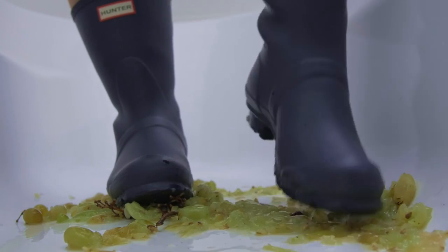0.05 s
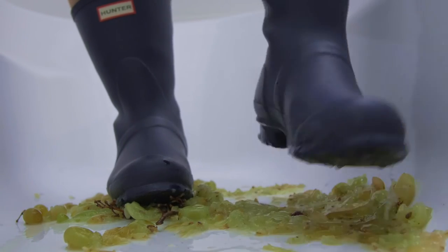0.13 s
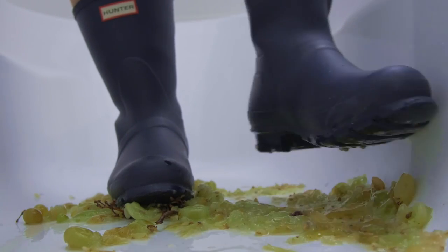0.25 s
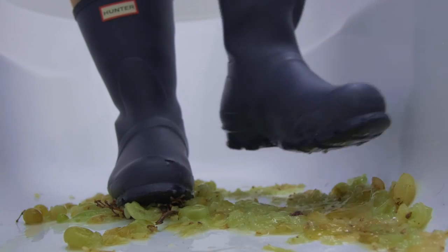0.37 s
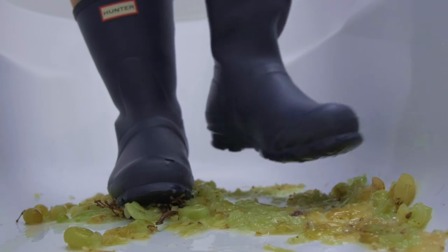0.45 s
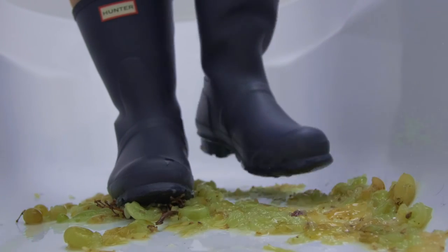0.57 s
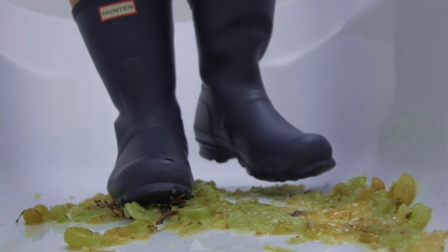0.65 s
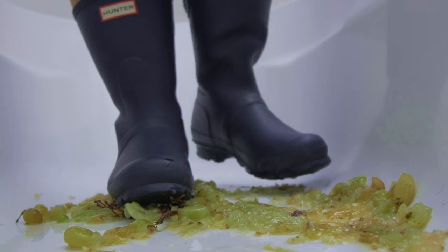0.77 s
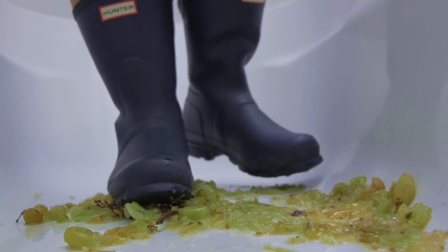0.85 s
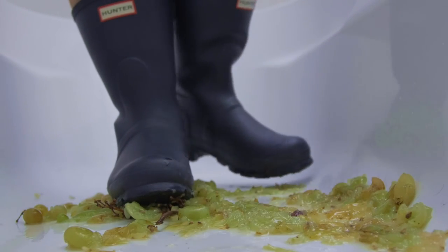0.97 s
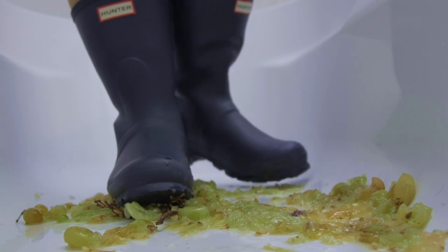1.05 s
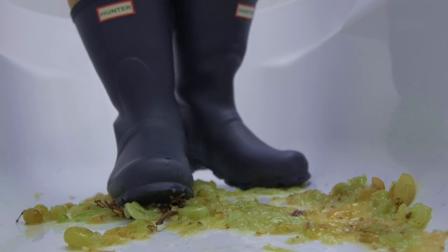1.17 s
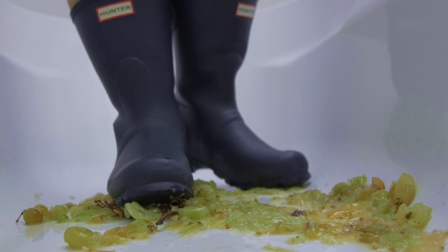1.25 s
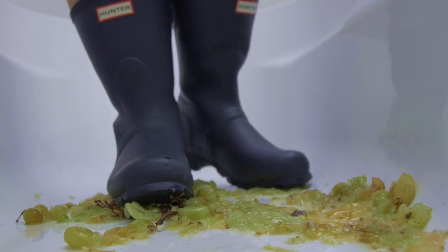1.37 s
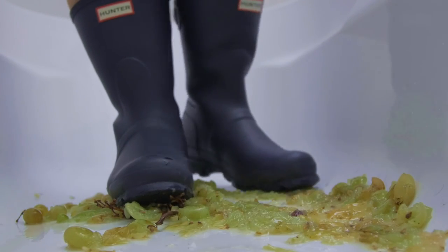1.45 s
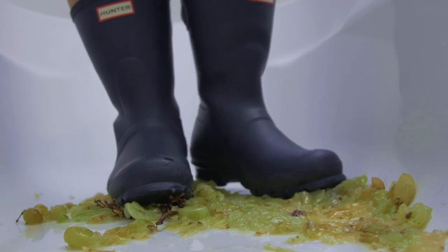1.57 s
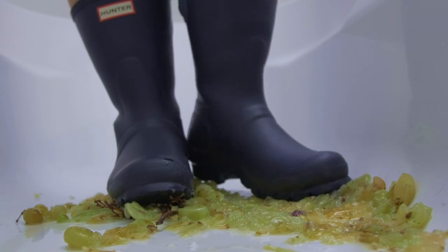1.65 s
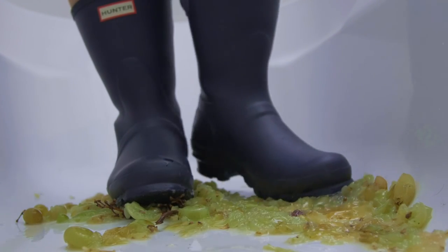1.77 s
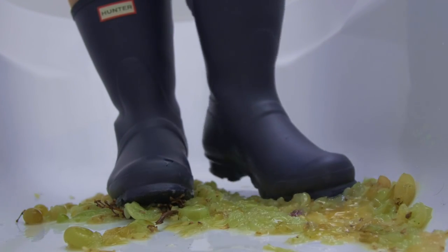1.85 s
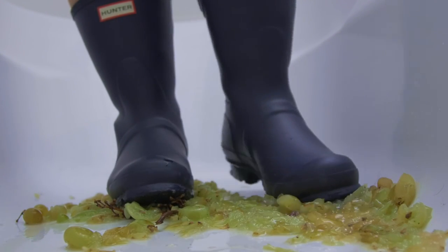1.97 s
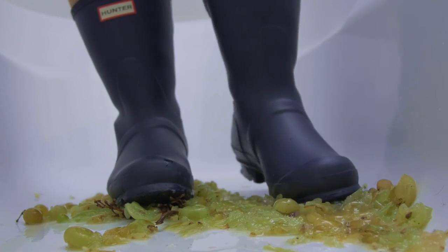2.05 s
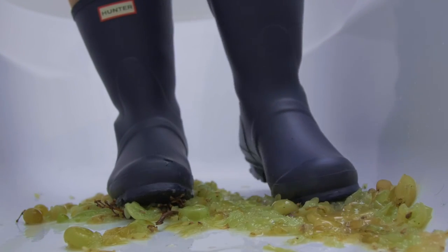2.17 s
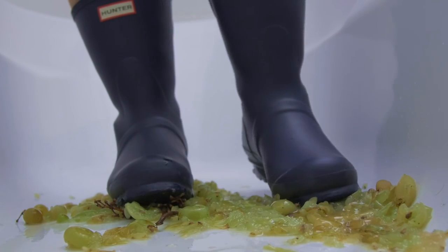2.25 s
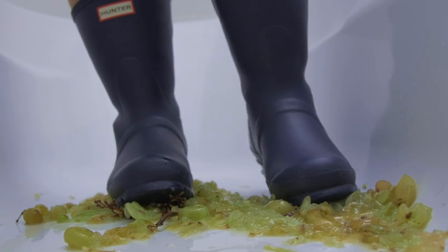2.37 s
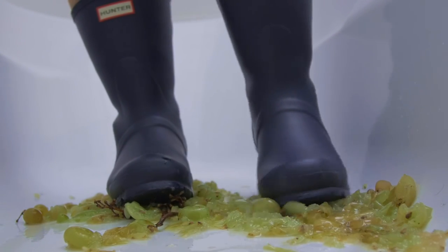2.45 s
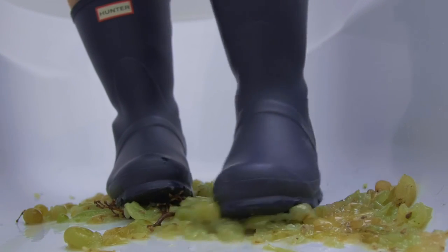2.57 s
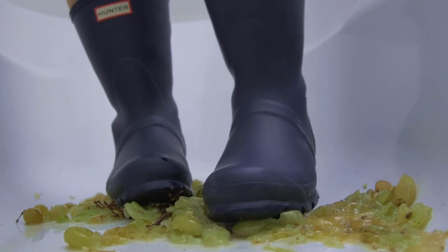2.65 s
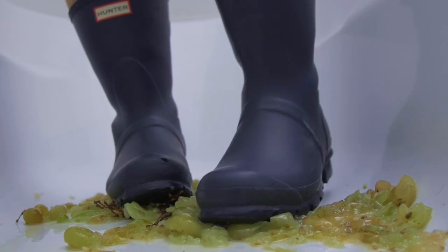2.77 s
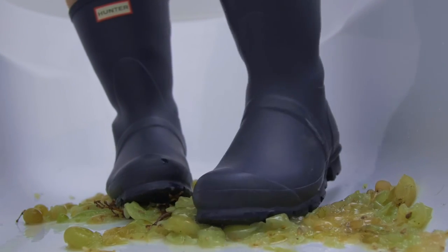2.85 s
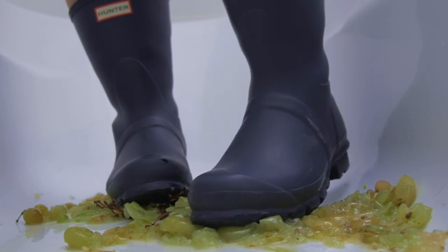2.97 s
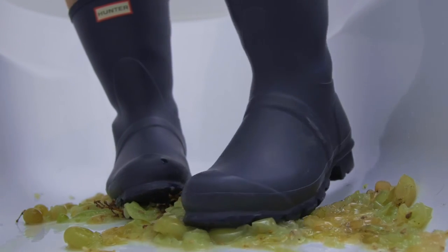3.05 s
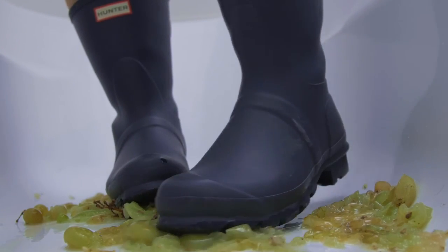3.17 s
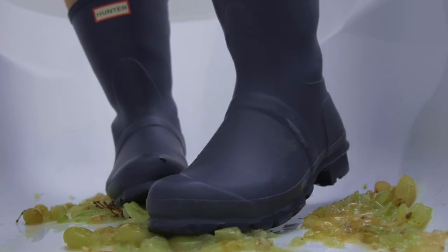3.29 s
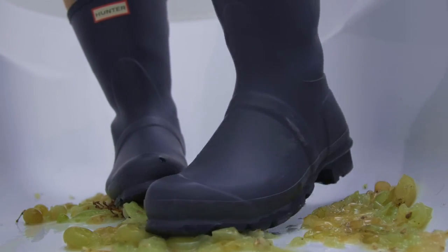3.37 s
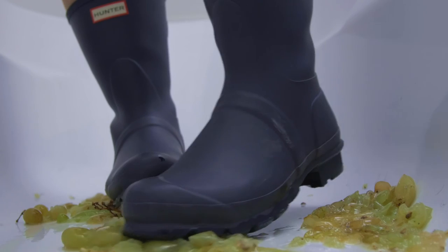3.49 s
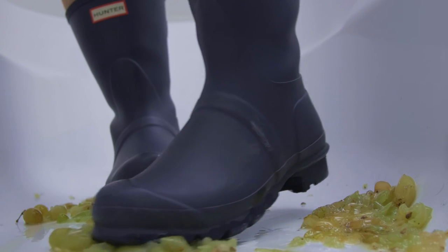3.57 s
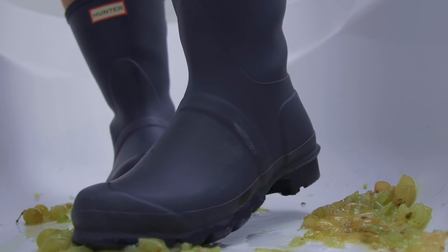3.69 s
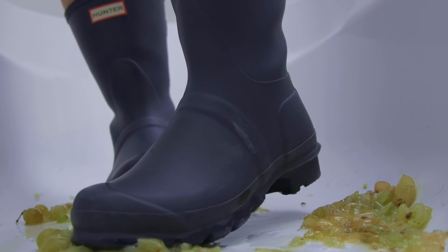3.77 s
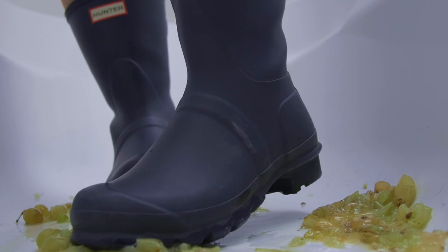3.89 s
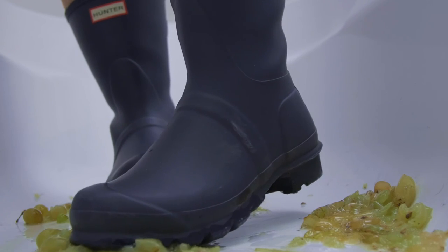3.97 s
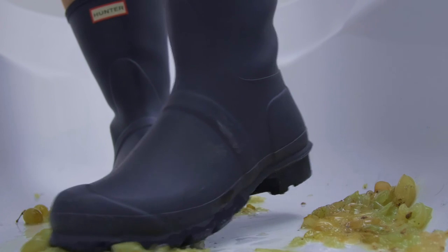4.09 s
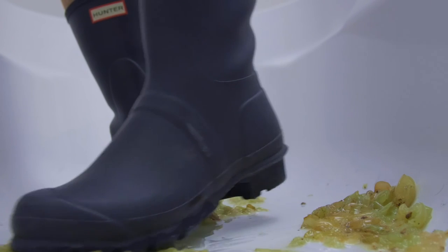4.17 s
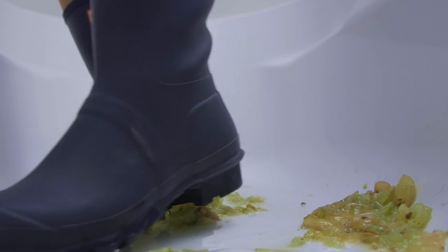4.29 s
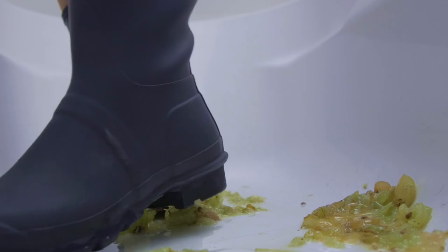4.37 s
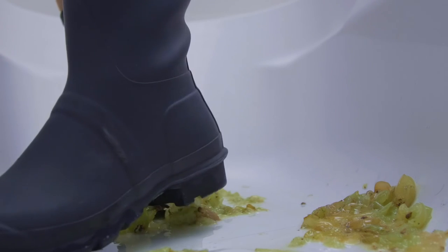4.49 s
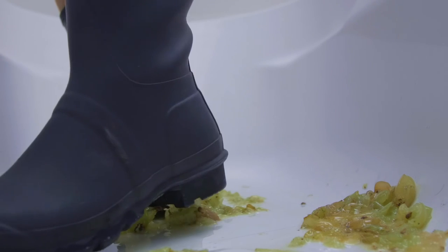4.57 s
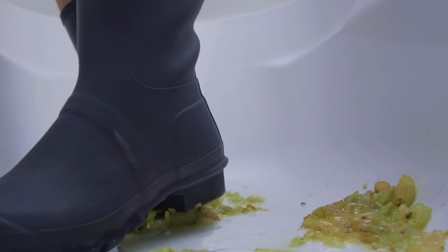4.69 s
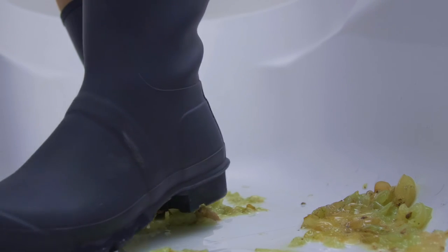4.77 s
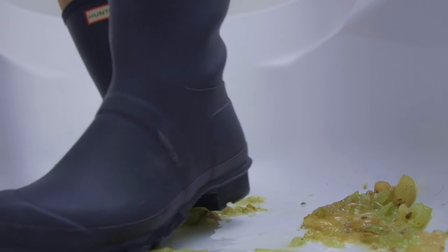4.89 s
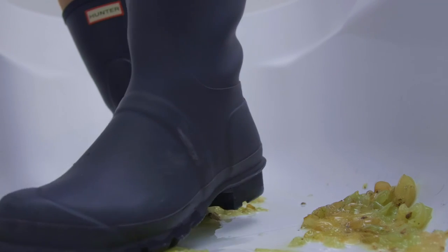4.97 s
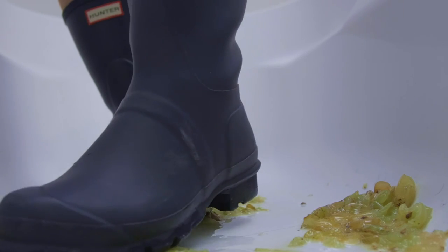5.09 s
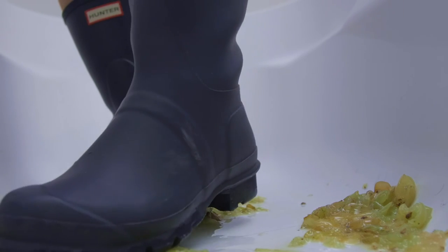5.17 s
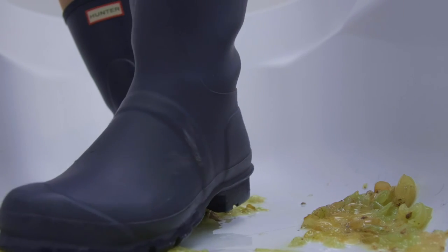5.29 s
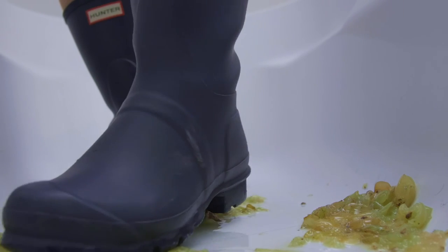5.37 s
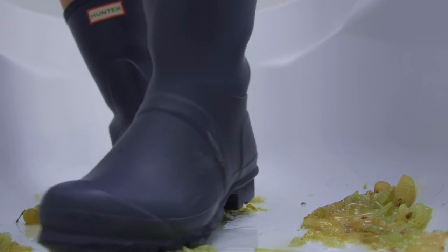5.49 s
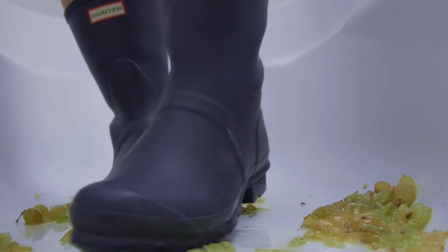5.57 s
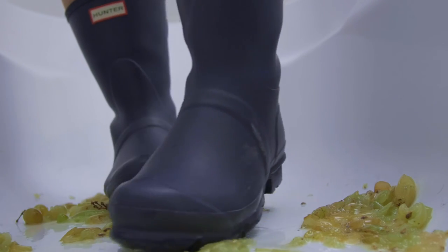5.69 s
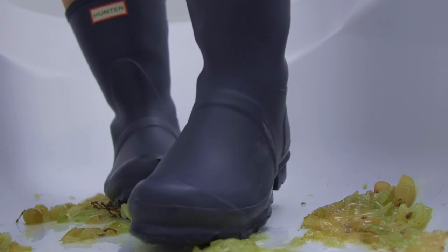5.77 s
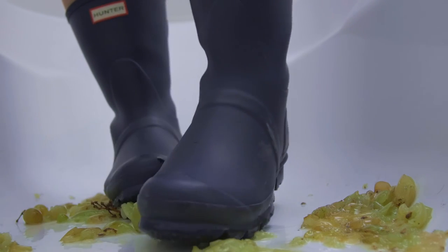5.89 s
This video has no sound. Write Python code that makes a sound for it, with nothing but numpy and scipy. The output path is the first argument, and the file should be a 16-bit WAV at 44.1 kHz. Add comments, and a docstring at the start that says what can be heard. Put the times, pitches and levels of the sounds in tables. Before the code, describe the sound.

A close microphone hears rubber boots on crushed grapes inside a hard tub, with a short, lively echo. A quiet low hum beats slowly throughout, with a faint far engine drone, rumble and room tone. From 0 to 0.25 s the sole peels away in small wet snaps and scuffs; at 0.27 s it bumps the tub with a dull, low thud. Only faint brushing follows until 1.15 s. Brief scrapes and chirps come at 1.2, 1.4 and 1.6 s, then a wavering squeak from 1.7 to 2.05 s. At 2.35-2.7 s a squeal sweeps upward, snaps and drops. Longer squeaky drags rise and fall at 3.0-3.3, 3.45-3.7 and 4.05-4.45 s, the last with four soft knocks from 4.18 to 4.36 s. More rubbery, gritty strokes come at 4.7-5.05 and 5.4-5.7 s, with sharp wet clicks near 5.5 s, then a thin descending squeak fades out.

```python
"""Throughout, a machine hums with a slow beat, a far engine drones, and rumble and room tone lie below.
First a rubber boot peels off grape pulp with wet snaps and scuffs, and bumps the wall of a hard tub.
Then it drags to and fro: the sole sticks and slips, so stacked sines squeak at a pitch that follows the
sliding speed, wrapped in scraping made of random grains and tiny chirps. Late in the dragging it knocks
four times more, as short blows into ringing tub modes. A small echoing room answers the boot."""
import sys
import numpy as np
from scipy import signal
from scipy.fft import rfft, irfft, next_fast_len
from scipy.io import wavfile

SR = 44100
rng = np.random.default_rng(int(sys.argv[2]) if len(sys.argv) > 2 else 0)


def unload_audio(sound):
    """Save the sound as a 16-bit wav file, at the path given as the first command line argument."""
    columns = np.transpose(np.atleast_2d(sound))
    # keep every value between -1 and 1, then stretch to whole-number steps
    steps = np.round(np.clip(columns, -1, 1) * 32767)
    wavfile.write(sys.argv[1], SR, steps.astype(np.int16))


def gain_from_decibels(decibels):
    """Convert decibel values to linear amplitude factors."""
    exponent = np.asarray(decibels, float) / 20
    return 10 ** exponent


N = 261954   # length [samples]

# Levels in the tables are those of each layer ahead of the mix.
# two close machine tones that beat: (frequency [Hz], phase [turns])
HUM_TONES = [(99.0, 0.0), (100.285, 0.02)]
# level of each machine tone: (level [dB])
HUM_LEVELS = [-48.5, -55.5]
# far engine, wandering in pitch: (time [s], frequency [Hz], level [dB])
ENGINE_DRONE = [(0, 59.7, -54), (1.0, 50.54, -62), (1.5, 51.73, -50), (1.9, 58.16, -50.5), (2.2, 63.1, -53),
                (2.8, 65.4, -56), (3.0, 60.4, -62), (3.2, 66.7, -51), (3.6, 62.5, -59), (4.3, 65.9, -71),
                (4.5, 66.7, -54), (5.0, 64.4, -60), (5.3, 63.2, -77.5), (5.94, 64, -57)]
# colour of the room tone: (frequency [Hz], density [dB per Hz])
ROOM_TONE = [(82, -44), (140, 1), (316, -8), (377, -9), (561, -13.5), (670, -19.5), (903, -17.5),
             (1100, -17.5), (1570, -22), (1700, -28), (1880, -24.5), (3480, -23), (5480, -33),
             (7680, -37.5), (16000, -37.5)]
# colour of the faint steady hiss, opposite in the two channels: (frequency [Hz], density [dB per Hz])
SIDE_HISS = [(60, -21), (300, -11.5), (2000, -16), (15000, -22), (17000, -38)]
# decay of the room: (frequency [Hz], time to fall 60 dB [s])
ROOM_DECAY = [(200, 0.44), (1000, 0.36), (3500, 0.36), (8000, 0.33), (15000, 0.23)]
# resonances of the air in the tub: (frequency [Hz], width [Hz], level [dB])
TUB_AIR = [(421, 30, 2.5), (1013, 24, -3.5), (1340, 52, -9.5), (2230, 73, -44), (2660, 120, -12.5),
           (3005, 19, -27), (3720, 430, -1.5), (4270, 23, -35), (3940, 34, -20.5), (5200, 71, -67.5)]
# modes of the tub wall: (frequency [Hz], level [dB], time to fall 60 dB [s])
TUB_WALL = [(69.8, -14, 0.51), (93.5, -9, 0.49), (128, 0, 0.43), (182, 13, 0.11), (267, 4, 0.17),
            (430, -7.5, 0.25)]
# the boot knocks the tub: (time [s], blow strength [dB])
KNOCKS = [(0.271, -15.5), (4.18, -38.5), (4.231, -33.5), (4.294, -30.5), (4.359, -32)]
# wet snaps and catches of the tread: (time [s], peak [dB], ring [Hz], rise to the peak [cycles])
WET_SNAPS = [(0.025, -40, 360, 1.5), (0.043, -49, 446, 2.4), (0.074, -28.5, 2830, 1.2),
             (0.132, -42.5, 1600, 2), (0.179, -31.5, 4100, 3.2), (0.198, -46, 718, 3.7),
             (1.14, -44, 4070, 2.6), (1.371, -42, 3870, 3.5), (1.601, -32, 2620, 5.7),
             (2.27, -52, 429.5, 3), (2.595, -4, 1946, 2.6), (4.372, -10, 2744, 9.3),
             (5.489, -15, 3930, 2.7), (5.555, -10.5, 2920, 6.3), (5.568, -7, 3540, 2),
             (5.582, -3, 4200, 1.2)]
# light brushes without a squeak:
# (time [s], length [s], level [dB], dull part [dB against level], bright part [dB against level])
BRUSHES = [(0.0, 0.085, -36.5, -8, -13), (0.075, 0.087, -42.5, -10, -5.5), (0.169, 0.042, -37.5, 0.5, -5),
           (0.403, 0.08, -53, -14, -19), (0.542, 0.235, -53, -22, -4.5), (0.836, 0.45, -67, -8, 11.5),
           (1.138, 0.017, -34, -15, -11), (2.744, 0.11, -32, -6, -15)]
# colour of the rubbing bodies: (frequency [Hz], density [dB per Hz])
RUB_COLOUR = [(120, -44.5), (200, -6.5), (278, -13), (590, -6.5), (683, -4.5), (1320, -5.5), (1710, -7),
              (1980, -4), (2420, 0), (3620, -1.5), (6880, -13), (13800, -25), (16000, -35)]
# the sole slides, one table a stroke:
# (time [s], slip rate [Hz], squeak [dB], overtones [dB against squeak], scrape [dB])
STROKES = [
    [(1.16, 8400, -71, 0, -46), (1.172, 5600, -37.5, -9, -31.5), (1.192, 2100, -35, 0, -15),
     (1.205, 954, -37, 2.5, -9.5), (1.217, 490, -30.5, -4, -18), (1.235, 300, -61, -4, -57)],
    [(1.371, 600, -63, -8, -33.5), (1.387, 1050, -36.5, -21, -28.5), (1.397, 1863, -52.5, 8, -21.5),
     (1.43, 3730, -47, 3, -30), (1.46, 4000, -63, 4, -30)],
    [(1.6, 2200, -75, -5, -31), (1.612, 2140, -49, 2, -22), (1.623, 2002, -17.5, -5, -18),
     (1.645, 1500, -21, 3.5, -33), (1.66, 1073, -28.5, -10, -18), (1.688, 370, -38.5, -12, -16.5),
     (1.7, 300, -76, -3, -58)],
    [(1.72, 600, -73, 2, -23), (1.744, 950, -46, -4, -21), (1.754, 1250, -37, -12, -21.5),
     (1.764, 1727, -31, 0.5, -15), (1.792, 2230, -29.5, -3.5, -35), (1.835, 2000, -28, 0.5, -18),
     (1.865, 2000, -35.5, 0.5, -33), (1.9, 2600, -27.5, -5, -28), (1.93, 2633, -24.5, -4.5, -26.5),
     (1.96, 2500, -27.5, -3.5, -20.5), (1.982, 1940, -28, 6.5, -13), (2.016, 1255, -26.5, -5, -21),
     (2.03, 876, -33, 1, -30), (2.048, 403, -36, -11, -35), (2.06, 300, -55, -14, -40)],
    [(2.352, 650, -54, -12, -42), (2.374, 790, -51, -4, -45), (2.384, 800, -49, 3.5, -42)],
    [(2.385, 374, -38, 13.5, -20.5), (2.4, 500, -31.5, -4, -17), (2.42, 650, -30.5, -0.5, -20),
     (2.45, 1278, -24, -6, -20), (2.46, 2150, -47, 5, -6), (2.474, 2790, -21.5, -30, -26.5),
     (2.5, 3700, -27.5, -10.5, -18.5), (2.536, 5130, -26.5, -8.5, -40.5), (2.548, 5300, -36, -3, -34),
     (2.57, 5160, -70, 0, -31)],
    [(2.594, 1870, -37, -16, -13.5), (2.614, 1920, -42, -23, -8.5), (2.64, 1950, -31, 11, -10),
     (2.652, 1196, -16.5, -5, -11.5), (2.665, 317, -34.5, -15, -13), (2.68, 300, -83, 0, -18.5)],
    [(2.987, 354, -29, -15, -17), (3.003, 450, -35.5, 3.5, -52), (3.03, 545, -32, -2, -18.5),
     (3.064, 755, -22.5, -9.5, -25), (3.092, 1114, -27.5, -10, -12), (3.115, 1252, -26, 1, -21.5),
     (3.136, 1556, -18, -33, -3), (3.146, 1296, -40, 2, -14), (3.19, 1320, -44, -5, -21),
     (3.196, 1707, -29.5, -3, -14.5), (3.229, 1431, -19, -6, -24), (3.244, 1240, -23, -5.5, -41.5),
     (3.26, 861, -24.5, -7, -44), (3.275, 479, -27, -11, -10), (3.285, 400, -43, -12, -39)],
    [(3.44, 641, -34, -0.5, -15), (3.462, 1246, -24.5, -1.5, -17.5), (3.477, 1550, -11, -8.5, -36),
     (3.481, 1390, -30, -4, -13), (3.494, 1413, -35.5, 10, -18.5), (3.513, 1550, -36, 11, -11.5),
     (3.519, 4530, -44, -16, -24), (3.535, 4780, -31.5, -23, -37.5), (3.565, 5190, -31, -14, -37),
     (3.587, 4900, -29, -16, -29), (3.621, 3990, -33, -18, -25), (3.656, 3440, -42, -9, -11.5),
     (3.662, 1388, -23, -5, -20.5), (3.68, 1180, -29.5, -1.5, -15.5), (3.696, 787, -26.5, -3.5, -22.5),
     (3.708, 430, -30.5, -6, -28), (3.72, 300, -42, -5, -60)],
    [(4.053, 506, -25.5, -34, -28), (4.068, 600, -29.5, -10, -23.5), (4.095, 1248, -24, -5, -26.5),
     (4.11, 1486, -27.5, -6, -12), (4.136, 2056, -59.5, 27.5, -33), (4.16, 2080, -49.5, 31, -26),
     (4.166, 5450, -36, -9, -16), (4.19, 5270, -34, -14, -29), (4.205, 5500, -36, -7, -33),
     (4.218, 5850, -40, -5, -42), (4.235, 7800, -39, -15, -33), (4.246, 7000, -46, -13, -31),
     (4.252, 6250, -39, -3, -33), (4.296, 6200, -56, -20, -38)],
    [(4.298, 2830, -44, -10, -20), (4.306, 2900, -27, -17, -17.5), (4.318, 3100, -68, -12, -24.5),
     (4.339, 3459, -25, -34, -23.5), (4.366, 3350, -31.5, -20, -16.5), (4.374, 3100, -46, -21, -10),
     (4.393, 1550, -22.5, 4.5, -23.5), (4.406, 974, -32.5, 6, -20.5), (4.43, 279, -35.5, -9, -27.5),
     (4.44, 250, -31, -14, -51)],
    [(4.68, 468, -48, -4, -51), (4.707, 730, -33, -4, -21), (4.713, 276, -29, -4, -18),
     (4.735, 285.4, -24, -10, -25.5), (4.752, 287.2, -25.5, -5, -18), (4.765, 364.6, -26, -6, -14),
     (4.79, 639, -39, 12, -15.5), (4.824, 850, -32.5, 0, -9.5), (4.83, 1750, -20, 0.5, -12),
     (4.878, 1800, -37, 2, -15.5), (4.884, 1550, -23.5, 10.5, -18), (4.895, 1707, -35, 5.5, -22),
     (4.908, 1900, -23, -9, -22), (4.925, 1996, -36.5, 16, -26), (4.94, 1860, -45, 20, -15),
     (4.96, 1922, -42, 16, -20.5), (4.975, 1680, -45.5, 25.5, -21), (4.987, 1598, -28.5, 1, -31.5),
     (5.01, 900, -25.5, -8.5, -19), (5.04, 370, -24, -3.5, -36), (5.06, 220, -30.5, -41, -55)],
    [(5.386, 199, -35.5, -4, -12.5), (5.407, 281, -27.5, -0.5, -22.5), (5.44, 705, -22.5, -4, -11),
     (5.458, 860, -30.5, 1.5, -12), (5.472, 1250, -28, 3, -21), (5.486, 1817, -26.5, 2, -16),
     (5.5, 2150, -45, 19, -16), (5.511, 2223, -16, -23, -36.5), (5.528, 2180, -30, 0, -12),
     (5.545, 2513, -28, -6, -39), (5.563, 2870, -16, -12, -41), (5.569, 2150, -43, 4, -41),
     (5.6, 2220, -52, 15, -41), (5.63, 2134, -40, 13.5, -18.5), (5.655, 2224, -50.5, 17, -26),
     (5.685, 2130, -58, 20, -35)],
    [(5.69, 7400, -43, -16, -43), (5.71, 7600, -43, -13, -35), (5.752, 7600, -44, -18, -50),
     (5.782, 6500, -36.5, -14, -36), (5.816, 3964, -39, -9, -43.5), (5.852, 2940, -44, -8, -35.5),
     (5.882, 2350, -42, -24, -35.5), (5.887, 1700, -35, -20, -41), (5.905, 1500, -53, -18, -59),
     (5.94, 1250, -77, 0, -72)],
]
# treble fizz, one table a stroke, ahead of a common lift: (time [s], level [dB])
STROKE_FIZZ = [
    [(1.16, -60), (1.164, -51), (1.174, -42), (1.2, -35), (1.235, -46)],
    [(1.371, -53), (1.385, -40), (1.423, -41.5), (1.46, -44)],
    [(1.6, -47), (1.61, -30.5), (1.642, -36.5), (1.7, -64)],
    [(1.72, -52), (1.778, -37.5), (1.866, -37), (1.902, -35.5), (2.012, -35.5), (2.06, -53.5)],
    [(2.352, -64), (2.354, -61), (2.38, -48), (2.384, -51)],
    [(2.385, -49), (2.395, -37.5), (2.523, -32), (2.551, -35), (2.559, -42.5), (2.57, -43)],
    [(2.594, -35), (2.636, -33), (2.68, -48)],
    [(2.987, -55), (3.003, -48.5), (3.125, -40), (3.239, -33.5), (3.265, -44.5), (3.285, -54)],
    [(3.44, -43), (3.568, -44), (3.574, -46), (3.624, -45), (3.634, -32.5), (3.694, -36.5), (3.72, -54)],
    [(4.053, -54.5), (4.067, -41.5), (4.155, -36), (4.167, -51.5), (4.261, -34), (4.287, -41.5),
     (4.296, -41)],
    [(4.298, -39), (4.31, -45.5), (4.322, -37), (4.372, -41), (4.44, -54)],
    [(4.68, -66), (4.708, -48.5), (4.836, -35.5), (4.954, -31), (5.022, -44), (5.06, -61)],
    [(5.386, -55), (5.4, -49), (5.596, -28), (5.602, -26), (5.618, -35), (5.685, -32.5)],
    [(5.69, -37), (5.812, -50.5), (5.828, -39.5), (5.94, -70)],
]
# extra dull scrape, one value a stroke: (level [dB])
STROKE_DULLNESS = [-3, 8.5, 5, -1, 6, -2.1, 0.1, -0.2, 4, 10.7, 6, 1.5, 1.5, -4]
# single tread blocks whistle:
# (time [s], length [s], start pitch [Hz], end pitch [Hz], start level [dB])
BLOCK_WHISTLES = [(1.19, 0.065, 928, 977, -32.5), (1.405, 0.016, 5060, 8500, -46.5),
                  (1.586, .016, 7000, 5600, -44), (1.602, 0.026, 7200, 6900, -28),
                  (1.936, .04, 4000, 2480, -25.5), (1.96, 0.035, 3500, 3810, -36),
                  (2.442, 0.017, 2263, 2860, -15), (2.603, .05, 2970, 2860, -25.5),
                  (3.55, 0.129, 1620, 1520, -44.5), (3.653, 0.05, 4500, 1976, -45),
                  (4.243, 0.045, 8050, 9800, -44), (4.303, .027, 7150, 6020, -34),
                  (4.348, 0.03, 2033, 2370, -21), (4.39, .025, 3330, 2800, -45),
                  (4.878, 0.029, 1830, 2026, -21.5), (4.894, 0.024, 5610, 6250, -22),
                  (4.966, .06, 2740, 2986, -26.5), (5.484, 0.071, 4100, 3660, -28.5),
                  (5.54, 0.038, 3600, 3930, -28), (5.584, 0.039, 5050, 4450, -24),
                  (5.632, 0.058, 5260, 5060, -36), (5.676, 0.054, 5120, 6670, -34.5)]
# tread blocks slipping together: (rate offset [share], level [dB])
TREAD_BLOCKS = [(0, 0.5), (-.06, -8.5)]


def rms_one(x):
    """Scales a signal to an rms of 1."""
    return x / np.sqrt(np.mean(x ** 2) + 1e-20)


def at_hz(points, hz):
    """Reads a table at any frequency, straight on a log frequency axis."""
    table = np.array(points)
    return np.interp(np.log(hz), np.log(table[:, 0]), table[:, 1])


def span(rows):
    """Gives the sample indices that a table covers, and its columns at those samples."""
    times, *columns = np.transpose(rows)
    at = np.arange(int(times[0] * SR), min(int(times[-1] * SR), N))
    return at, [np.interp(at / SR, times, column) for column in columns]


def drift(rate_hz):
    """Slow chance: noise twice through a one-pole low-pass, rms 1."""
    r = np.exp(-2 * np.pi * rate_hz / SR)
    noise = rng.standard_normal(N + SR)
    settled = signal.lfilter([1], [1, -2 * r, r * r], noise)[SR:]
    return rms_one(settled)


def shaped(x, points):
    """Weights the spectrum of x by a dB curve, rms 1."""
    size = next_fast_len(len(x))
    hz = np.maximum(np.arange(size // 2 + 1) * SR / size, 1)
    return rms_one(irfft(rfft(x, size) * gain_from_decibels(at_hz(points, hz)), size)[:len(x)])


def filtered(x, order, hz, kind):
    """Butterworth filter of the given kind."""
    return signal.sosfilt(signal.butter(order, hz, kind, fs=SR, output="sos"), x)


def edges(size, rise_s, fall_s):
    """Straight ramps for the quick start and soft end of a contact."""
    t = np.arange(size) / SR
    return np.minimum(1, np.minimum(t / rise_s, t[::-1] / fall_s))


def machine_hum():
    """Two steady sines a little over 1 Hz apart, so their sum swells and sinks."""
    t = np.arange(N) / SR
    out = np.zeros(N)
    for (hz, turns), db in zip(HUM_TONES, HUM_LEVELS):
        out += gain_from_decibels(db) * np.sqrt(2) * np.sin(2 * np.pi * (hz * t + turns))
    return out


def engine_drone():
    """One low sine whose pitch and level wander."""
    out = np.zeros(N)
    at, (hz, db) = span(ENGINE_DRONE)
    out[at] = gain_from_decibels(db) * np.sqrt(2) * np.sin(2 * np.pi * np.cumsum(hz) / SR)
    return out


def rumble():
    """Low band of noise that swells at random."""
    low = rms_one(filtered(rng.standard_normal(N), 2, [45, 80], "band"))
    return gain_from_decibels(-61 - 0.5 * drift(2.8)) * low


def room_tone():
    """Broad coloured noise whose level drifts by about 1 dB."""
    return gain_from_decibels(-52.5 + 1.0 * drift(2.3)) * shaped(rng.standard_normal(N), ROOM_TONE)


def background():
    """Sum of the hum, the drone, the rumble and the room tone."""
    return machine_hum() + engine_drone() + rumble() + room_tone()


def ring(blow, hz, t60):
    """A two-pole resonator rings like one mode of a struck body."""
    r, w = gain_from_decibels(-60 / (t60 * SR)), 2 * np.pi * hz / SR
    return signal.lfilter([0, np.sin(w)], [1, -2 * r * np.cos(w), r * r], blow)


def knocks(soft_hz, body_db):
    """Each knock is a soft, low-passed blow into the low modes of the tub."""
    blow = np.zeros(N)
    for s, db in KNOCKS:
        blow[round(s * SR)] = -gain_from_decibels(db + body_db)
    blow = filtered(blow + 1e-18, 2, soft_hz, "low")   # the offset only spares the filters tiny numbers
    return sum(gain_from_decibels(db) * ring(blow, hz, t60) for hz, db, t60 in TUB_WALL)


def snaps():
    """Each snap is a sine at its own pitch that swells and dies within a few cycles."""
    out, t = np.zeros(N), np.arange(SR // 20) / SR
    for s, db, hz, cycles in WET_SNAPS:
        at = round(s * SR)
        age = t * hz / cycles   # 1 at the peak
        swell = (age * np.exp(1 - age)) ** 2
        out[at:at + len(t)] += gain_from_decibels(db) * swell * np.sin(2 * np.pi * hz * t)
    return out


def contacts():
    """Yields sample indices, scrape level and its dull and bright shares for every contact of the sole."""
    for rows, fizz, duller_db in zip(STROKES, STROKE_FIZZ, STROKE_DULLNESS):
        at, (hz, *_, db) = span(rows)
        # slow sliding is duller, up to a ceiling
        dull_db = np.minimum(-9.5 - 9.5 * np.log2(hz / 1000), -7) + duller_db
        fizz_db = np.interp(at / SR, *np.transpose(fizz)) + 9.5
        yield at, (db, dull_db, fizz_db - db)
    for s, length, db, dull_db, bright_db in BRUSHES:
        # a brush weakens by 4 dB along its length
        yield span([(s, db, dull_db, bright_db), (s + length, db - 4, dull_db, bright_db)])


def chirps(count, longest_s, sweep):
    """Single skins and tread edges let go in brief gliding whistles, scattered in time and pitch."""
    out = np.zeros(N + SR)
    for when, pitch, length, glide, size in rng.random((count, 5)):
        t = np.arange(int(SR * longest_s * (0.35 + 0.55 * length))) / SR
        hz = 2000 * 6.5 ** pitch * np.exp(sweep * (2 * glide - 1) * t / longest_s)
        at = int(when * N)
        level = gain_from_decibels(at_hz(RUB_COLOUR, hz[0]) + 4.8 * size) * np.sqrt(hz[0])
        whistle = np.sin(2 * np.pi * np.cumsum(np.minimum(hz, 16000)) / SR)
        out[at:at + len(t)] += level * np.hanning(len(t)) * whistle
    return rms_one(out[:N])


def scrape(grit_db, grains_per_s, patchy_db):
    """Dense random grains of skins and seeds under the sole, in dull, middle and bright parts."""
    sizes = gain_from_decibels(grit_db * np.minimum(rng.exponential(1, N), 4)) * rng.standard_normal(N)
    grains = sizes * (rng.random(N) < grains_per_s / SR)
    grit = shaped(grains, RUB_COLOUR) + gain_from_decibels(-6.0) * chirps(count=1500, longest_s=0.04, sweep=0.35)
    parts = (filtered(grit, 3, 1300, "low"),
             filtered(grit, 3, [1300, 6500], "band"),
             filtered(grit, 3, 6500, "high"))
    # each part grows patchy by itself
    dull, middle, bright = [rms_one(part) * gain_from_decibels(patchy_db * drift(53.0)) for part in parts]
    out = np.zeros(N)
    for at, (db, dull_db, bright_db) in contacts():
        mix = middle[at] + gain_from_decibels(dull_db) * dull[at] + gain_from_decibels(bright_db) * bright[at]
        out[at] += edges(len(at), 0.00033, 0.0023) * gain_from_decibels(db) * mix
    return out


def slides():
    """Yields sample indices, slip rate, squeak level and overtone level of every squeak."""
    for rows in STROKES:
        table = np.array(rows)
        # rows closer than 7.5 ms mark a jump: the squeak breaks off and starts anew
        jumps = np.flatnonzero(np.diff(table[:, 0]) < 0.0075) + 1
        for piece in np.split(table, jumps):
            at, columns = span(piece)
            yield at, columns[:3]
    overtones_db, fade_db = -16, -6
    for s, length, from_hz, to_hz, db in BLOCK_WHISTLES:
        yield span([(s, from_hz, db, overtones_db), (s + length, to_hz, db + fade_db, overtones_db)])


def squeaks(wobble, stray, flutter_db, slope_db, purer_db, colour):
    """Stick-slip partials: the slip rate wobbles, each partial flutters and a neighbour block joins in."""
    out = np.zeros(N)
    flutter = [drift(120.0) for _ in range(5)]
    for block, (offset, block_db) in enumerate(TREAD_BLOCKS):
        shake, wander = drift(252.0), drift(12.0)
        for at, (hz, first_db, overtones_db) in slides():
            hz = hz * (1 + offset * (1 + stray * wander[at]))
            unrest = np.clip(hz / 1270, 0.45, 1)   # slower slips come more evenly
            phase = 2 * np.pi * np.cumsum(hz * (1 + wobble * unrest * shake[at])) / SR
            # upper partials fall off faster at high slip rates
            fall_db = np.minimum(slope_db + purer_db * np.log2(hz / 1000), 0)
            fade = edges(len(at), 0.004, 0.0081)
            for k in range(1, 17):
                db = first_db + block_db + flutter_db * unrest * flutter[(k + 2 * block) % 5][at]
                if k > 1:
                    # only even partials may outgrow the first
                    lead_db = overtones_db if k % 2 == 0 else np.minimum(overtones_db, 0)
                    # the rubbing bodies colour the partials above the second
                    body_db = at_hz(RUB_COLOUR, k * hz) - at_hz(RUB_COLOUR, 2 * hz)
                    db = db + lead_db + fall_db * np.log2(k / 2) + colour * body_db
                audible = k * hz < 15500
                out[at] += fade * audible * gain_from_decibels(db) * np.sin(k * phase + k * k)
    return out


def tub(x, share):
    """The air in the tub lifts a few resonant bands out of what sounds inside it."""
    out = x.copy()
    for hz, width, db in TUB_AIR:
        r, w = np.exp(-np.pi * width / SR), 2 * np.pi * hz / SR
        gain = (1 - r * r) / 2
        out += share * gain_from_decibels(db) * signal.lfilter([gain, 0, -gain], [1, -2 * r * np.cos(w), r * r], x)
    return out


def room(x):
    """Tub and tiled walls answer with noise that dies band by band."""
    t, tail = np.arange(SR) / SR, np.zeros(SR)
    corners = 150 * 2 ** np.arange(0, 7.1, 0.5)   # half octaves [Hz]
    for low, high in zip(corners, corners[1:]):
        band = filtered(rng.standard_normal(SR), 2, [low, high], "band")
        tail += band * gain_from_decibels(-60 * t / at_hz(ROOM_DECAY, np.sqrt(low * high)))
    tail *= np.clip(t / 0.0034, 0, 1)   # echoes build up over 3.4 ms
    return signal.fftconvolve(x, tail / np.sqrt(np.sum(tail ** 2)))[:N]


def side_flicker(x):
    """A flickering difference between the two channels: x smeared by brief noise, strongest in the treble."""
    t = np.arange(SR // 40) / SR
    smear = rng.standard_normal(len(t)) * gain_from_decibels(-60 * t / 0.095)
    bright = x + gain_from_decibels(7.5) * filtered(x, 2, 6000, "high")
    return signal.fftconvolve(bright, smear / np.sqrt(np.sum(smear ** 2)))[:N] * drift(33.0)


def scene():
    """Mixes boot, room, knocks and background, then spreads them over two channels."""
    grit = gain_from_decibels(-11.5) * tub(scrape(grit_db=0.79, grains_per_s=20000.0, patchy_db=2.9), share=0.63)
    squeal = gain_from_decibels(3.5) * squeaks(wobble=0.01104, stray=0.76, flutter_db=4.5,
                                slope_db=-9.0, purer_db=-2.0, colour=0.86)
    boot = squeal + grit + snaps()
    echo = gain_from_decibels(-8) * room(tub(boot, share=1.0))
    middle = boot + echo + knocks(soft_hz=265, body_db=-12.0) + background()
    hiss = gain_from_decibels(-71) * shaped(rng.standard_normal(N), SIDE_HISS)
    side = gain_from_decibels(-27.5) * side_flicker(middle) + hiss
    return middle + side * np.array([[1], [-1]])


def band_limit(x):
    """A steep low-pass at the top of the band."""
    return signal.sosfilt(signal.butter(12, 16650, fs=SR, output="sos"), x)


def record(dry):
    """The deepest bass is cut and peaks are rounded."""
    trimmed = filtered(dry, 3, 48.0, "high")
    finished = 0.91 * np.tanh(trimmed / 0.88)
    return band_limit(finished)


dry = scene()
out = record(dry)
unload_audio(out)
```